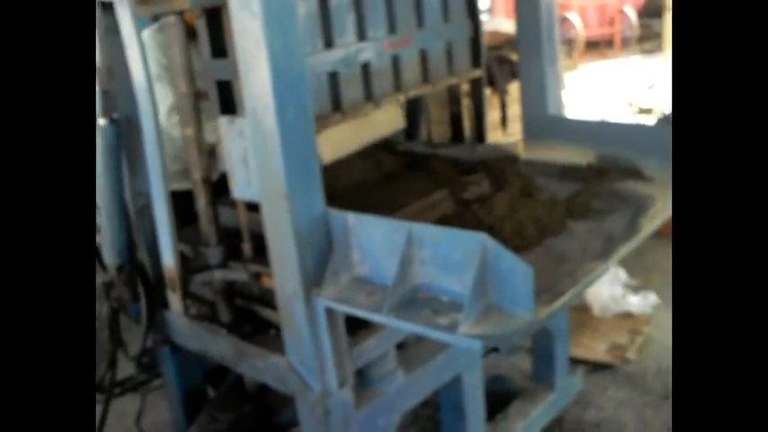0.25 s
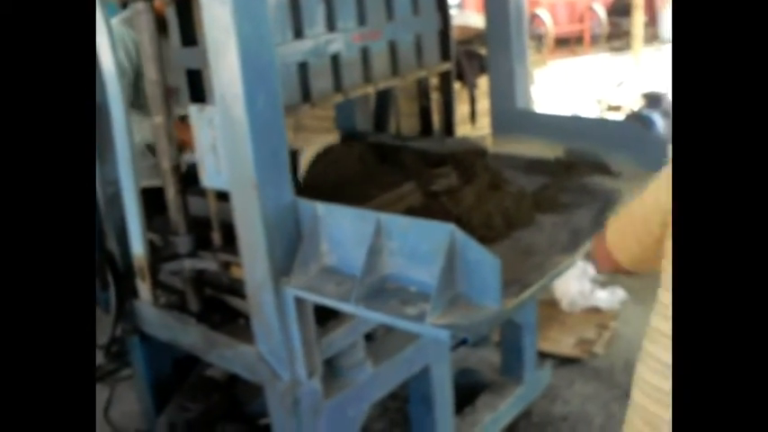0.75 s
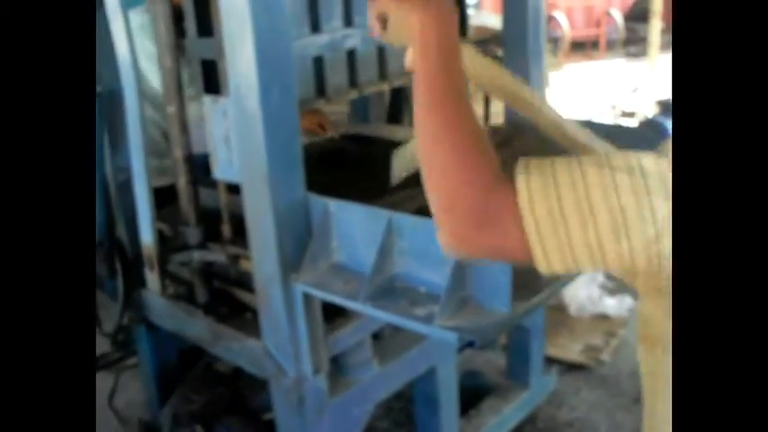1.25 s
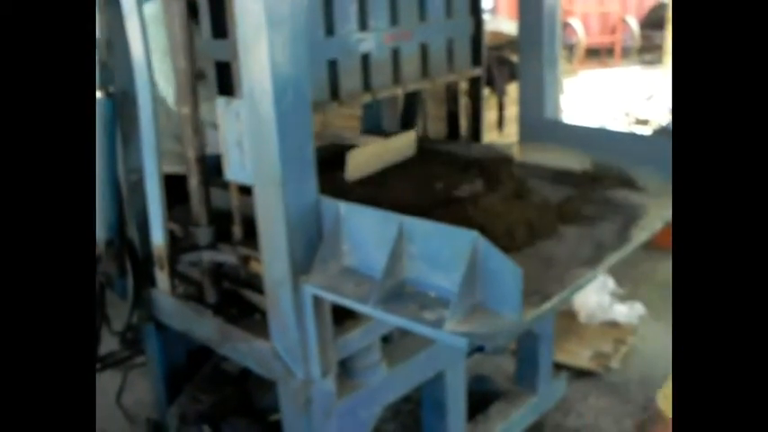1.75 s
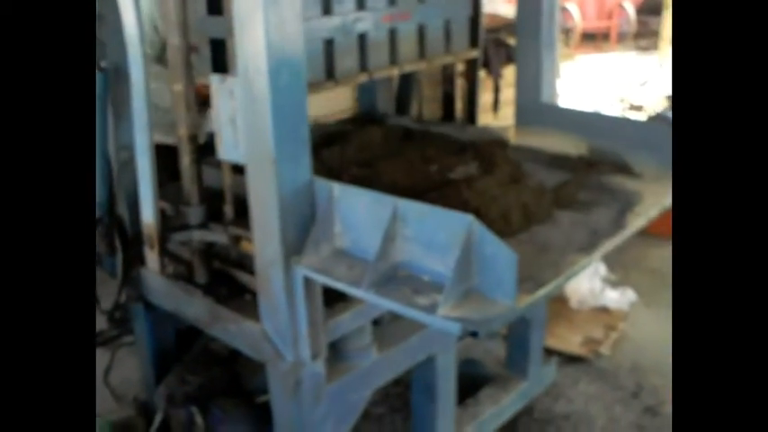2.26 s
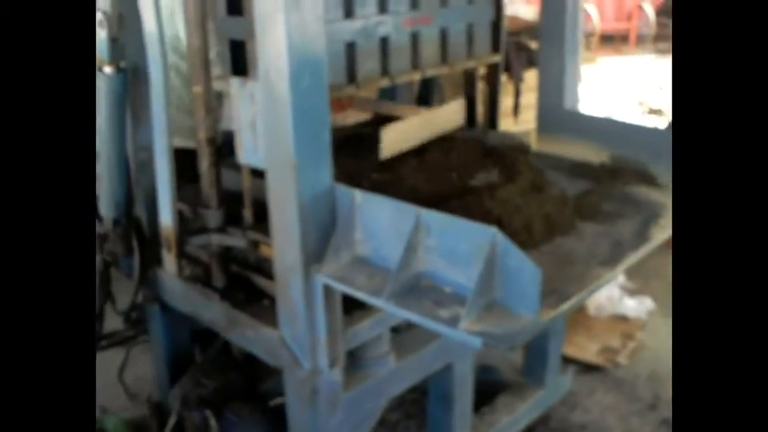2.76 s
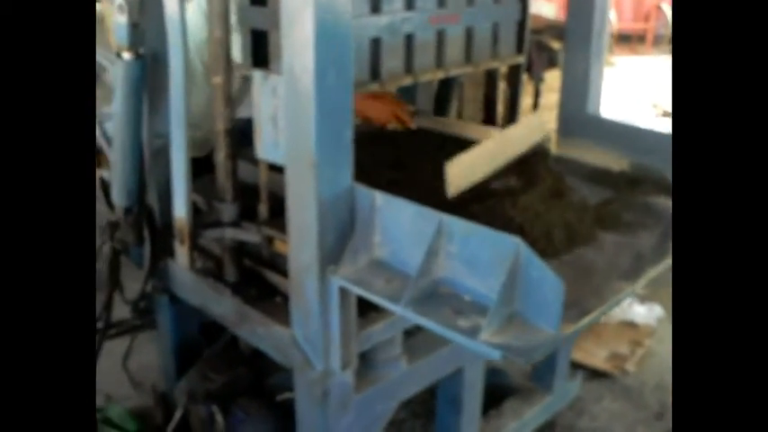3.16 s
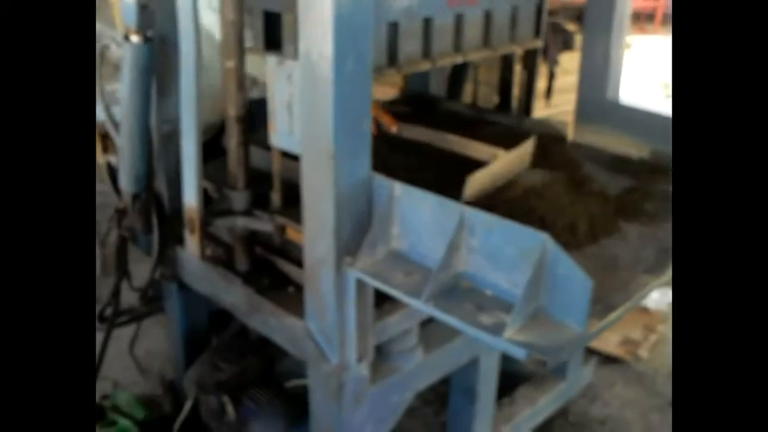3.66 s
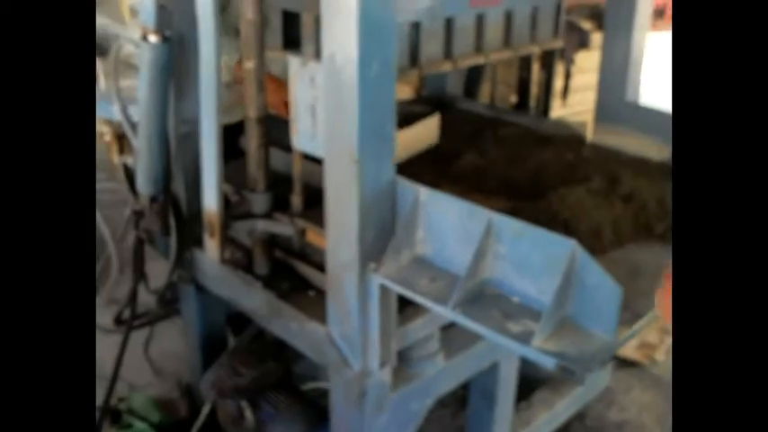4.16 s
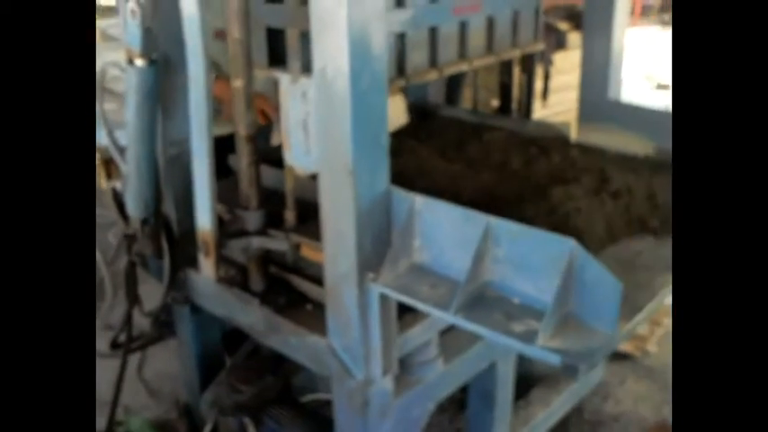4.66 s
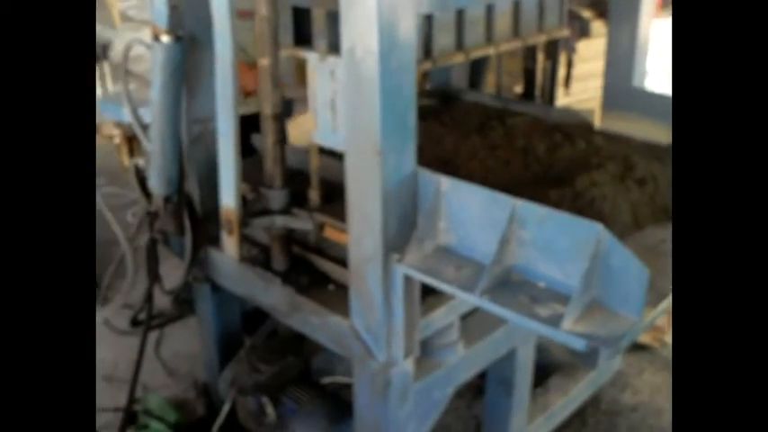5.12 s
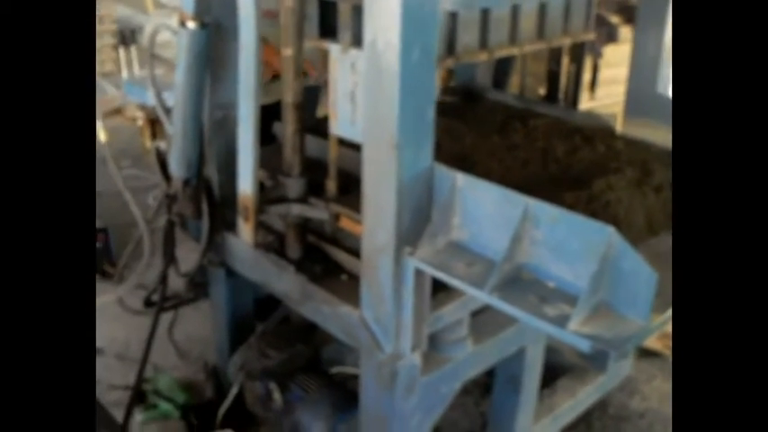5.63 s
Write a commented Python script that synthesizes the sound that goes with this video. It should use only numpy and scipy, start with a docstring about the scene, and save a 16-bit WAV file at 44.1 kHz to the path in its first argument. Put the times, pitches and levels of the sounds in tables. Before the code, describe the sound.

In a factory shed, a pump hums and whines without stopping. A wooden hoe drags damp, stony mix over a steel mould in short rasps, with crunching knocks and slight metallic ring, strongest near 2.5 and 3.4 seconds. Dull pops and rubbing of fingers on the handheld microphone cluster around three and four seconds, dipping the level; the drone alone ends it.

```python
"""A wooden hoe pushes damp concrete mix over a steel mould: filtered noise and grains scrape, blows ring modes.
Behind it the pump of a hydraulic block press drones: multiples of the shaft speed over a throbbing rush.
Fingers shift on the hand-held camera: short damped pulses pop and rub at its one microphone,
and at times a fingertip half covers the port, which lowers the level of the other sounds."""
import sys
import numpy as np
from scipy import signal
from scipy.fft import rfft, irfft, next_fast_len
from scipy.io import wavfile
from scipy.ndimage import uniform_filter1d

SR = 44100
rng = np.random.default_rng(int(sys.argv[2]) if len(sys.argv) > 2 else 0)


def unload_wav(signal):
    """Save mono or channel-first audio to the path in sys.argv[1] as 16-bit WAV at rate SR, clipped to [-1, 1]."""
    wavfile.write(
        sys.argv[1],
        SR,
        np.round(np.clip(np.atleast_2d(signal).T, -1, 1) * 32767).astype(np.int16),
    )


N = 259749
T = np.arange(N) / SR  # time in seconds
SHAFT_HZ = 25.585  # turns of the pump shaft per second, on average
EDGE_HZ = 10900  # upper band limit

# Strong pump tones. Each row: multiple of the shaft speed, relative level in dB before the note shifts,
# relative level in dB after it.
PUMP_TONES = [(6, -70, -71), (18, -57, -67), (20, -55, -57), (24, -60, -54), (25, -56, -55), (36, -63, -55),
              (37, -52.5, -54.5), (54, -59, -58), (78, -55, -53), (82, -61, -55), (88, -53.5, -44.7),
              (89, -48, -47.5), (90, -52, -50.5), (91, -58, -54), (92, -51, -54), (94, -54, -56),
              (97, -72, -51), (98, -53, -52), (99, -53, -63), (100, -53, -54), (107, -62, -57),
              (110, -66, -56), (113, -54, -72), (120, -54, -54), (126, -59, -58), (129, -67, -53),
              (130, -52, -51), (138, -77, -58), (179, -65, -63), (267, -72, -60)]
# The gradual shift of the pump's note: start in seconds, end in seconds.
SHIFT_TIMES = (2.6, 4.9)
# Spectrum of the many weak shaft multiples. Each row: frequency in Hz, relative level in dB.
BUZZ_SPECTRUM = [(100, -8.5), (300, -13), (500, -6), (950, -0.5), (1400, 3), (1950, -6), (2330, 5.5),
                 (2800, -15), (3300, 3), (4000, -8), (6200, 0.5), (8000, -11), (11000, -18.5)]
# Spectrum of the rush of oil and fan. Each row: frequency in Hz, relative level in dB.
RUSH_SPECTRUM = [(25, -13), (60, -12.5), (120, -20), (170, -6), (300, -9), (500, -4), (760, -2.5), (950, 2),
                 (1300, -6.5), (1700, 1.5), (2350, 2), (2900, 0), (3400, -0.5), (4100, -4.5), (6200, -9.5),
                 (8000, -15.5), (10800, -25.5)]
# Level of the pump's drone at the camera. Each row: time in seconds, gain in dB.
DRONE_LEVEL = [(0, -1), (.5, .5), (1.39, -0.16), (1.43, -4.5), (1.53, -3), (1.95, 0.95), (2.45, 1.5),
               (2.65, -1), (3.35, 0.55), (4.1, -1.5), (5, 0.07), (5.89, 1.25)]
# The whine is a cluster of pump tones around this pitch in Hz, with this sharpness Q.
WHINE_HZ, WHINE_Q = 2290, 14
# Level of the whine against the rest of the drone. Each row: time in seconds, gain in dB.
WHINE_LEVEL = [(0, 3.5), (1.35, -1.5), (1.7, 2), (2.35, 1.5), (3.1, -2), (3.3, 4), (3.7, 0), (4.1, -2.5),
               (4.75, -3), (5.2, 2), (5.89, 0.5)]

# The loudest finger pops on the camera body. Each row: start in seconds, relative peak in dB, pitch in Hz.
POPS = [(0.121, -30.5, 291), (0.608, -32.5, 342), (0.74, -29, 450), (0.783, -28.5, 480),
        (0.792, -29.5, 420), (2.881, -27, 410), (3.03, -25, 460), (3.046, -27, 520), (3.095, -27, 536),
        (3.145, -21.5, 665), (3.179, -34, 380), (3.525, -31, 302), (3.832, -27, 680), (4.156, -24.5, 520),
        (4.22, -26.5, 367), (4.272, -27, 441), (4.359, -26.5, 506), (4.367, -24, 506),
        (4.394, -33.5, 397.5), (4.451, -27, 580), (4.485, -23, 605), (4.554, -25, 705), (4.652, -27.5, 413)]
# Fingers rubbing on the camera body. Each row: start in seconds, end in seconds, level in dB.
RUBS = [(0, 4.9, -58), (.03, .19, -46), (.67, .83, -45.5), (1.01, 1.07, -50), (2.855, 2.888, -42),
        (2.998, 3.035, -43.5), (3.072, 3.188, -44.5), (3.5, 3.68, -50), (3.74, 3.87, -47),
        (4.11, 4.24, -45), (4.25, 4.38, -42), (4.44, 4.68, -48)]
# A finger presses on the microphone port. Each row: start in seconds, time until release in seconds,
# loss in dB, time constant of the release in seconds.
PRESSES = [(.115, 0.036, 6, 0.09), (.607, 0.017, 7, 0.039), (.682, .012, 10.5, 0.16),
           (2.78, 0.14, 2.5, 0.054), (2.879, .015, 13.5, .1), (3.028, 0.14, 13, 0.11),
           (3.528, .012, 8.5, 0.071), (3.835, 0.069, 2, 0.038), (4.16, 0.17, 4, .05),
           (4.365, .05, 12, 0.15), (4.485, 0.047, 11.5, 0.017)]
CLOSE_S = 0.0048  # seconds a fingertip takes to reach the full loss

# Modes of the steel mould. Each row: frequency in Hz, relative level in dB, t60 in seconds.
MOULD_MODES = [(790, -10, .12), (926, -8, .17), (1184, -4, .24), (1215, -9, .15), (1750, -14, .1),
               (2536, -9, .28), (3440, -1, .17), (3510, -7, .13), (3640, -9, .18), (5642, -16, .25),
               (6072, -22, .2)]
# Modes of the thin table edge, damped by the mix lying on it. Each row: frequency in Hz, relative level
# in dB, t60 in seconds.
TABLE_EDGE_MODES = [(3180, -25, 0.17), (3460, -11, 0.16), (3950, -10, 0.27), (4400, -25, .13),
                    (4530, -7, 0.1), (4595, -1, 0.13), (5030, -9, 0.13)]
# Knocks of the hoe on the steel. Each row: start in seconds, relative level in dB, brightest frequency of
# the crunch in Hz, its t60 in seconds, then in dB against that level: knock of the wooden blade,
# ring of the mould, ring of the table edge.
KNOCKS = [(0.607, -34, 3000, 0.033, 3.5, -21, -20), (.989, -31, 1910, 0.083, -17, -21, -22),
          (1.391, -26.5, 3680, 0.18, -13, 3, -7), (1.529, -27, 3700, 0.084, -7, -21, -19),
          (1.606, -30, 6300, 0.027, -18, -17, -9.5), (2.45, -26, 6000, 0.014, -1, -29, -24),
          (2.509, -22, 3850, .03, -20, -13, -3), (2.748, -24, 4170, 0.034, -3, -23, 4),
          (3.394, -19.5, 4200, 0.082, -14, -28, -27), (3.586, -22, 4400, 0.055, -22, -28, -10),
          (3.863, -24.5, 3680, 0.063, -3, -25, -19), (3.924, -31, 3500, 0.06, 1.5, -22, -18),
          (4.554, -31.5, 2372, 0.13, -1.5, -24, -20)]
# Hoe strokes. Each row: start in seconds, length in seconds, grinding of stones in relative dB, hiss of sand
# in relative dB, swell from start to end in dB, resonance of blade and gap in Hz at the start and at the end.
STROKES = [(1.18, .07, -44, -39.5, 1, 6500, 5560), (1.471, 0.072, -43.5, -38.5, 15, 5000, 1800),
           (2.251, 0.068, -39, -33.5, -11.5, 7040, 5600), (2.26, 0.072, -35, -34, 4, 1900, 1540),
           (2.347, 0.053, -28, -25.5, 2, 1790, 1560), (2.407, .085, -31.5, -28.5, -4.5, 950, 740),
           (2.495, 0.049, -28.5, -24, 7, 930, 1060), (2.594, 0.16, -39, -40, -9.5, 1650, 1690),
           (2.736, 0.057, -31.5, -39.5, 0.5, 4500, 4280), (3.403, 0.024, -36, -43, 1, 4950, 4880),
           (3.533, 0.026, -42, -36.5, 2, 5100, 5100), (3.58, .13, -40, -37.5, -4, 5080, 4950),
           (3.716, 0.081, -39, -36, 8, 4900, 4540), (3.822, .05, -38.5, -43, 0, 2600, 2000),
           (3.917, 0.11, -37, -33, 1, 1710, 1410), (4.042, .06, -46, -37, -4, 1500, 1500),
           (4.554, 0.1, -39.5, -35, -11, 2100, 1550), (4.667, 0.072, -37, -30.5, 8, 2496, 1680),
           (4.738, 0.094, -32.5, -33.5, -5.5, 860, 794)]
# Colour of the sliding grit. Each row: frequency in Hz, gain in dB.
GRIT_SPECTRUM = [(100, -8), (400, 7), (800, 10.5), (1800, 10.5), (3000, 9.5), (5000, 8), (7000, 5.5),
                 (9000, 1.5), (11000, -9.5)]
# Ringing of the gap under the blade: added gain at its top (a factor), sharpness Q.
GAP_RING = (1.8, 6)
# The blade bites in a linear rise; the grit trickles out with this time constant after it stops (seconds).
BITE_S, TRICKLE_S = 0.013, 0.024
# Sand hisses less as the blade digs in and its resonance sinks.
HISS_DB_PER_OCTAVE = 5


def amp(db):
    """Decibel law: the amplitude factor for a level in dB."""
    return 10 ** (np.asarray(db) / 20)


def unit(x):
    """Normalisation of power: scales a signal to rms 1."""
    return x / np.sqrt(np.mean(x ** 2) + 1e-20)


def read(points, hz):
    """Spectral envelope: gain of a (Hz, dB) curve, interpolated over log frequency."""
    knot_hz, knot_db = np.transpose(points)
    return amp(np.interp(np.log(hz + 1), np.log(knot_hz + 1), knot_db))


def add(mix, start, sound):
    """Superposition: adds a sound into the mix from its start in seconds."""
    part = mix[max(round(start * SR), 0):][:len(sound)]
    part += sound[:len(part)]


def colour(x, gain):
    """Linear filtering: multiplies the spectrum by a gain that is a function of frequency."""
    size = next_fast_len(len(x))
    freqs = np.fft.rfftfreq(size, 1 / SR)
    return irfft(rfft(x, size) * gain(freqs), size)[:len(x)]


def bump(f, hz, q):
    """Simple resonance: response of one damped oscillator, 1 at its top."""
    return 1 / np.sqrt(1 + (q * ((f + 1) / hz - hz / (f + 1))) ** 2)


def wander(hz):
    """Slow random fluctuation: low-passed noise of rms 1, its rate mostly below hz."""
    return unit(colour(rng.standard_normal(N), lambda f: np.exp(-(f / hz) ** 2)))


def grains(per_s, spread_db):
    """Random impulse train: clicks at chance times, mostly small and a few large."""
    size = amp(spread_db * np.minimum(rng.exponential(1, N), 3))
    struck = rng.random(N) < per_s / SR
    return unit(size * rng.choice([-1, 1], N) * struck)


def rattle(turns):
    """Periodicity: one turn's worth of weak shaft multiples, repeated with every turn."""
    cycle = np.arange(8192) / 8192
    orders = np.arange(len(cycle) // 2 + 1)
    hz = orders * SHAFT_HZ
    lines = read(BUZZ_SPECTRUM, hz) * (orders > 3) * (hz < EDGE_HZ)
    lines = lines * amp(0.73 * rng.standard_normal(len(orders)))
    lines = lines * np.exp(2j * np.pi * rng.random(len(orders)))
    # leave room for the strong tones
    lines[[round(row[0]) for row in PUMP_TONES]] = 0
    return np.interp(turns, cycle, unit(irfft(lines)), period=1)


def pump_tones(turns, waver=0.31, scatter_turns=.15):
    """Harmonic partials: strong shaft multiples, each with its own slow swell and phase drift."""
    shift = np.interp(T, SHIFT_TIMES, [0, 1])
    whine_db = np.interp(T, *np.transpose(WHINE_LEVEL))
    knots = np.linspace(0, T[-1], 40)
    # neighbouring multiples keep roughly in step, so each cluster of tones flutters once a turn
    orders = np.arange(4097)
    anchors = orders[::8]
    phase = np.interp(orders, anchors, 2 * rng.random(len(anchors)))
    phase = phase + scatter_turns * rng.standard_normal(len(orders))
    tones = np.zeros(N)
    for order, first_db, late_db in PUMP_TONES:
        swell = np.interp(T, knots, waver * rng.standard_normal(len(knots)))
        drift = np.interp(T, knots, waver * rng.standard_normal(len(knots)))
        level = np.sqrt(2) * amp(first_db + shift * (late_db - first_db)) * (1 + swell)
        level = level * amp(whine_db * bump(order * SHAFT_HZ, WHINE_HZ, WHINE_Q) ** 2)
        tones += level * np.sin(2 * np.pi * (order * turns + phase[round(order)]) + drift)
    return tones


def pump(buzz_db=-40.5, rush_db=-38, buzz_waver=0.7, jitter_turns=0.00024, throb=0.037):
    """Rotating machinery: shaft multiples stand over broadband flow noise that throbs with the turns."""
    turns = SHAFT_HZ * T + jitter_turns * wander(6.4)
    # the lines swell and fade as the camera moves through the sound field
    moving = wander(1.77) * rattle(turns) + wander(4.8) * rattle(turns)
    buzz = unit(rattle(turns) + buzz_waver * moving)
    rush = unit(colour(rng.standard_normal(N), lambda f: read(RUSH_SPECTRUM, f)))
    # twice a turn, and half as deep once a turn
    rush *= 1 + throb * np.cos(2 * np.pi * 2 * turns) + .5 * throb * np.cos(2 * np.pi * turns)
    return amp(buzz_db) * buzz + pump_tones(turns) + amp(rush_db) * rush


def shed(x, t60=0.23, wet_db=-9):
    """Reverberation: sparse, decaying echoes scattered from the machine frame and the roof."""
    t = np.arange(SR // 2) / SR
    taps = rng.standard_normal(len(t)) * (rng.random(len(t)) < 2000 / SR)
    taps = taps * (t > .004) * amp(-60 * t / t60)
    echoes = signal.oaconvolve(x, taps / np.linalg.norm(taps))[:N]
    return x + amp(wet_db) * echoes


def pop(hz, cycles=0.5, snap=0.22, snap_hz=1150):
    """Damped oscillation: one slip of skin, a dull pulse gone in a cycle or two, with a small snap in front."""
    t = np.arange(SR // 40) / SR
    dull = np.sin(2 * np.pi * hz * t) * np.exp(-hz * t / cycles)
    front = snap * np.sin(2 * np.pi * snap_hz * t) * np.exp(-snap_hz * t / cycles)
    pulse = signal.lfilter(*signal.butter(2, 230, "high", fs=SR), dull + front)
    return pulse / abs(pulse).max()


def fingers(pop_db=-2.0, slips_per_s=220):
    """Stick-slip friction: single pops, and runs of small slips while a finger slides."""
    pops, pressure = np.zeros(N), np.zeros(N)
    for start, db, hz in POPS:
        add(pops, start, amp(db + pop_db) * pop(hz))
    for start, end, db in RUBS:
        length = max(round((end - start) * SR), 2)
        add(pressure, start, amp(db) * signal.windows.tukey(length, .4))
    slips = sum(signal.oaconvolve(grains(slips_per_s, 1), pop(hz))[:N] for hz in (320, 490, 780))
    return pops + pressure * unit(slips)


def covered(x):
    """Obstruction: a finger shuts the port quickly, rests there and eases off; the firmest press counts."""
    losses_db = []
    for start, held, db, ease in PRESSES:
        closing = np.clip((T - start) / CLOSE_S, 0, 1)
        easing = np.exp(-np.maximum(T - start - held, 0) / ease)
        losses_db.append(db * closing * easing)
    return x * amp(-np.max(losses_db, axis=0))


def ring(modes, t):
    """Modal decay: a struck plate sounds as a sum of exponentially dying sines."""
    return sum(amp(db - 60 * t / t60) * np.sin(2 * np.pi * (hz * t + rng.random())) for hz, db, t60 in modes)


def knocks(level_db=1, q=2.55, wood_hz=1000, wood_q=0.91):
    """Impact excitation: each blow crushes grit, jolts the wooden blade and sets the steel ringing."""
    out, t = np.zeros(N), np.arange(SR // 2) / SR
    for start, db, hz, t60, wood_db, mould_db, edge_db in KNOCKS:
        crunch = unit(colour(rng.standard_normal(len(t)), lambda f: bump(f, hz, q)))
        wood = unit(colour(rng.standard_normal(len(t)), lambda f: bump(f, wood_hz, wood_q) ** 2))
        contact = (crunch + amp(wood_db) * wood) * amp(-60 * t / t60)
        steel = amp(mould_db) * ring(MOULD_MODES, t) + amp(edge_db) * ring(TABLE_EDGE_MODES, t)
        add(out, start, amp(db + level_db) * (contact + steel))
    return out


def hoe(level_db=-3, judder_db=1.0, gritty=0.6, hollow_hz=1300, patchy_db=2.27):
    """Granular friction: cracking grains and sliding sand excite a resonance that moves along each stroke."""
    drive = unit(gritty * grains(2500, 2.7) + 0.79 * rng.standard_normal(N))
    drive = drive * amp(judder_db * wander(59))
    f, t, z = signal.stft(drive, SR, nperseg=512)
    f = f[:, None]
    # 0 where stones grind, 1 where sand hisses
    sandy = np.interp(np.log(f + 1), np.log([1700, 4500]), [0, 1])
    gap_gain, gap_q = GAP_RING
    power = np.zeros(z.shape)
    for start, length, grind_db, hiss_db, swell_db, first_hz, last_hz in STROKES:
        now = (t > start) & (t < start + length + .5)
        age = t[now] - start
        along = np.minimum(age / length, 1)
        bite = np.minimum(age / BITE_S, 1)
        trickle = np.exp(-np.maximum(age - length, 0) / TRICKLE_S)
        push = bite * trickle * amp(swell_db * (along - .5))
        hz = first_hz * (last_hz / first_hz) ** along
        hiss = hiss_db + HISS_DB_PER_OCTAVE * np.log2(hz / np.sqrt(first_hz * last_hz))
        friction = amp(grind_db + sandy * (hiss - grind_db))
        low_cut = 1 / np.sqrt(1 + (0.73 * np.minimum(hz, hollow_hz) / (f + 1)) ** 6)
        gap = 1 + gap_gain * bump(f, hz, gap_q)
        power[:, now] += (push * friction * low_cut * gap) ** 2
    # each caught stone briefly rings its own narrow band
    patches = uniform_filter1d(rng.standard_normal(z.shape), size=4, axis=0)
    patches = unit(uniform_filter1d(patches, size=6, axis=1))
    z = z * np.sqrt(power) * amp(patchy_db * patches) * read(GRIT_SPECTRUM, f)
    return amp(level_db) * signal.istft(z, SR, nperseg=512)[1][:N]


def scene():
    """Superposition at one microphone: fingers cover the hoe and pump, add their noise; both channels match."""
    drone = pump() * amp(np.interp(T, *np.transpose(DRONE_LEVEL)))
    work = shed(hoe() + knocks())
    mono = covered(drone + work) + fingers()
    return np.array([mono, mono])


def record(dry, threshold_db=-27, squeeze=0.86, recovery_db_per_s=40):
    """Dynamic compression: loud sounds duck the whole level, peaks are rounded, then the band is limited."""
    power = signal.lfilter([1 / 200], [1, 1 / 200 - 1], dry[0] ** 2)
    power_db = 10 * np.log10(power + 1e-12)
    # hold each peak, then let it fall at a steady rate
    fall = T * recovery_db_per_s
    held_db = np.maximum.accumulate(power_db + fall) - fall
    over_db = np.maximum(held_db - threshold_db, 0)
    over_db = signal.lfilter([1 / 300], [1, 1 / 300 - 1], over_db)
    ceiling = .27
    rounded = ceiling * np.tanh(dry * amp(-squeeze * over_db) / ceiling)
    edge = signal.firwin(511, EDGE_HZ, window=("kaiser", 8), fs=SR)
    return signal.oaconvolve(rounded, edge[None], "same")


dry = scene()
out = record(dry)
unload_wav(out)
```